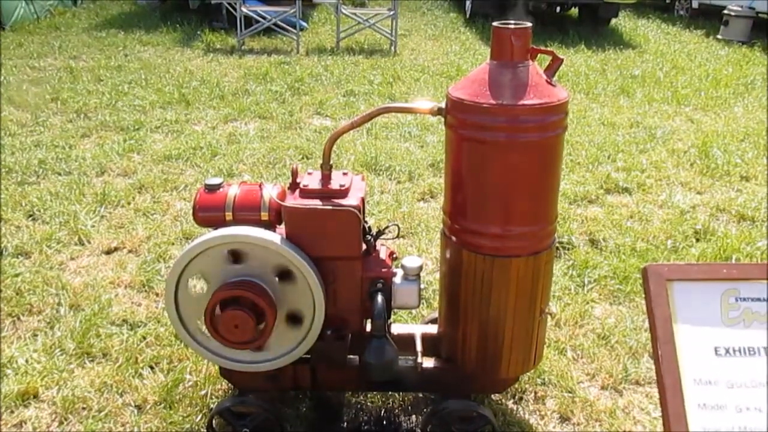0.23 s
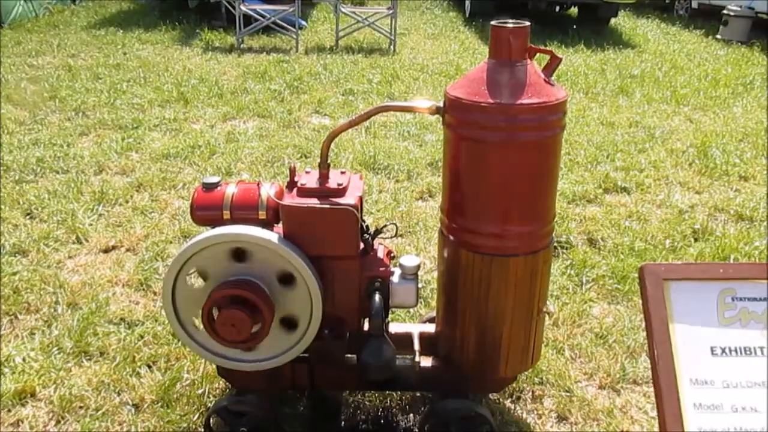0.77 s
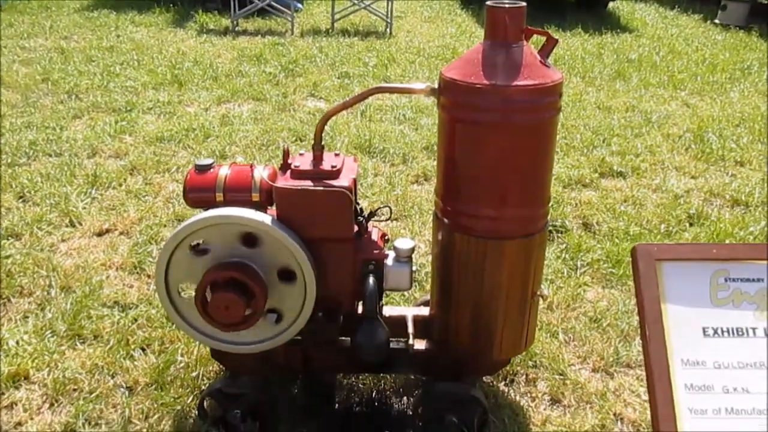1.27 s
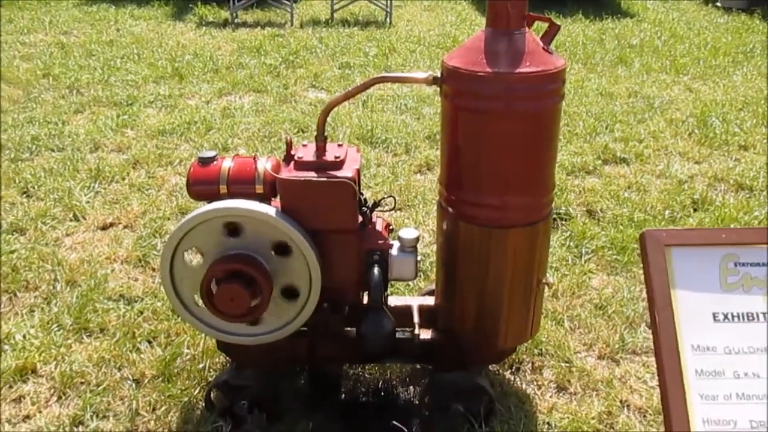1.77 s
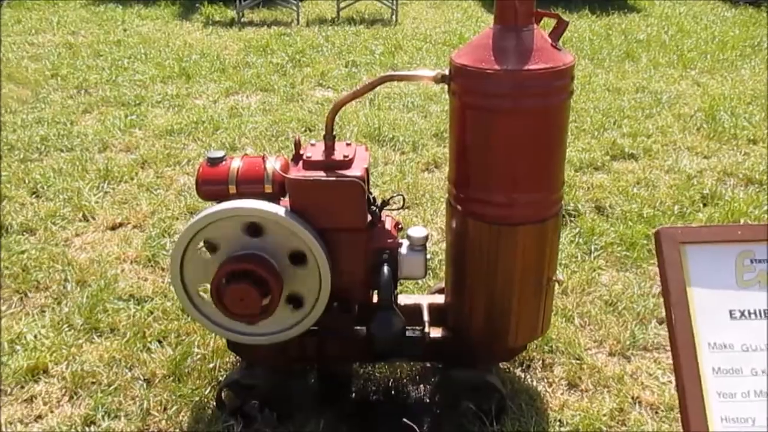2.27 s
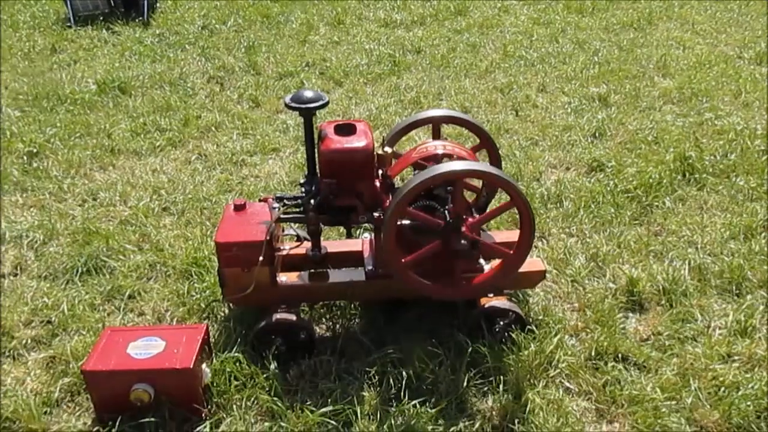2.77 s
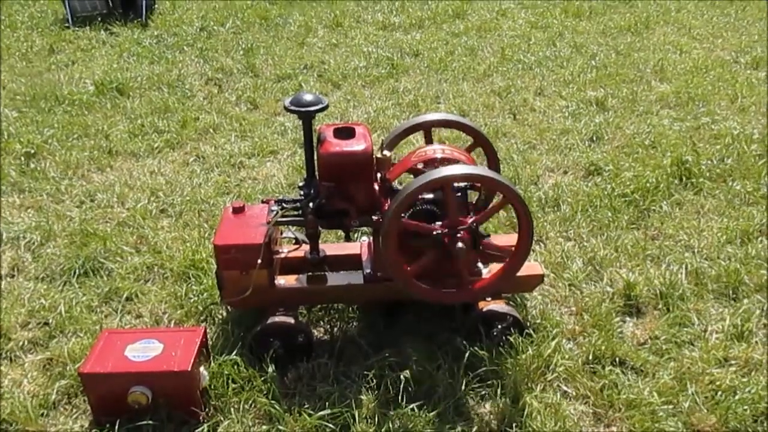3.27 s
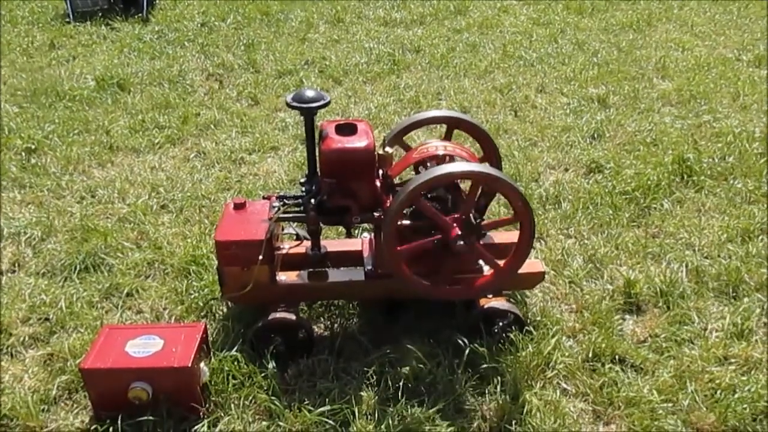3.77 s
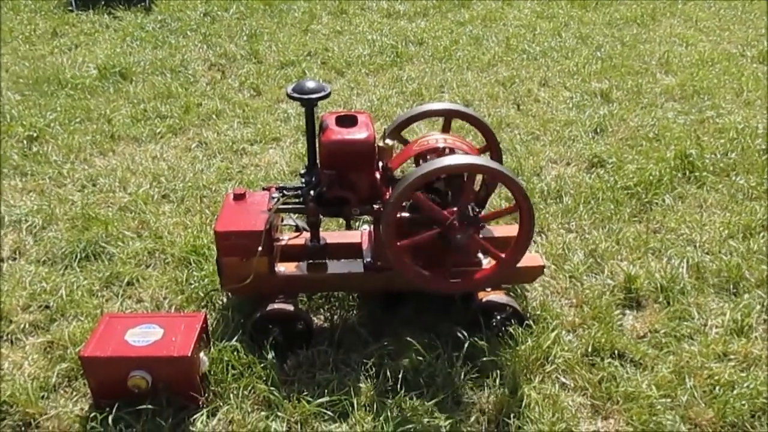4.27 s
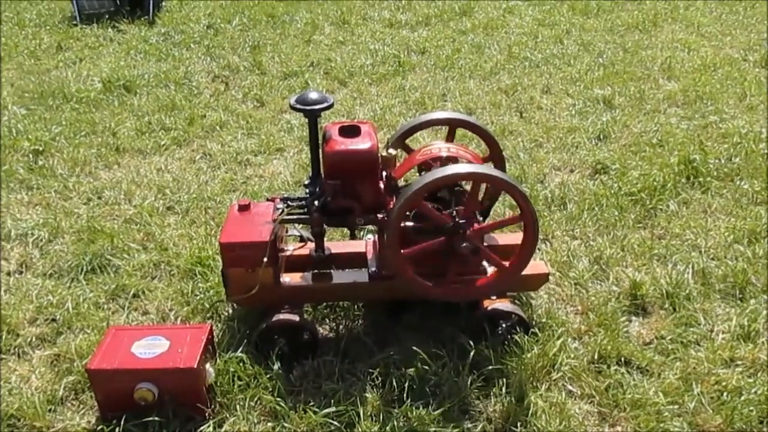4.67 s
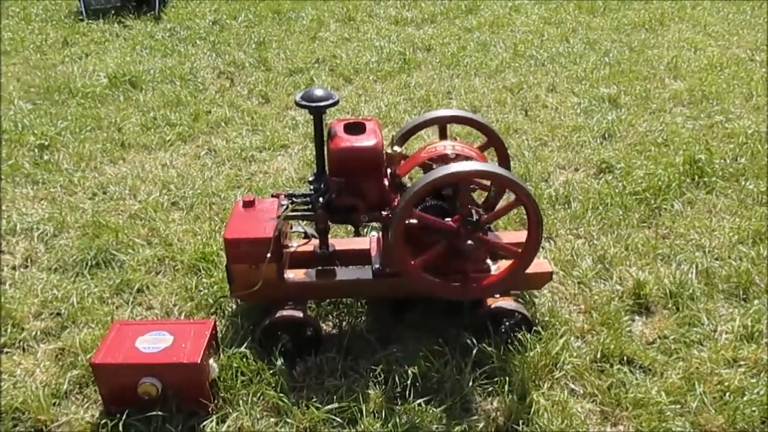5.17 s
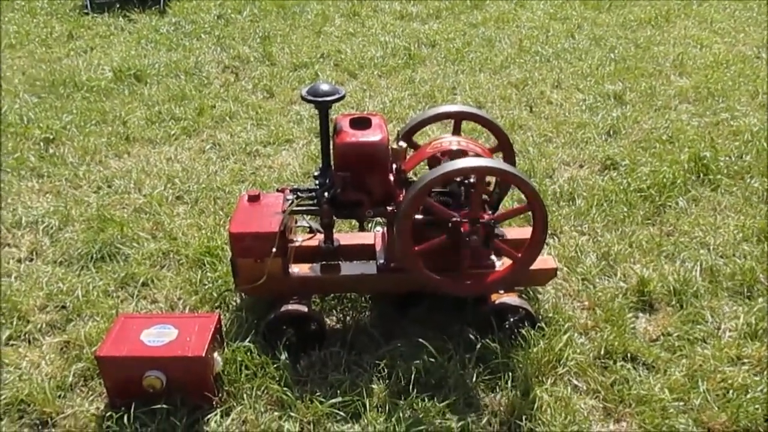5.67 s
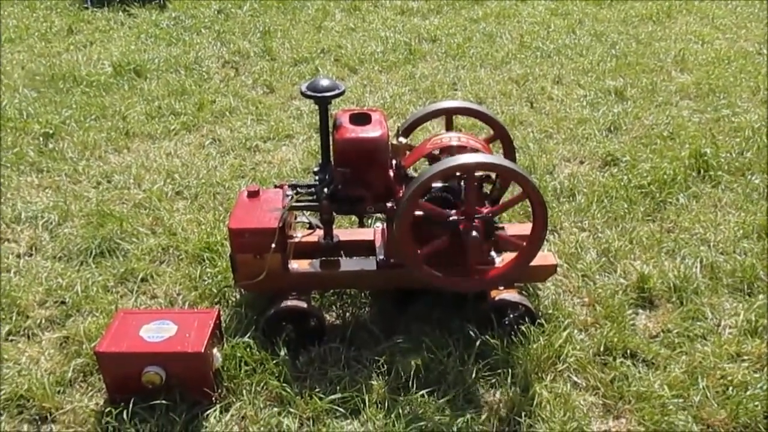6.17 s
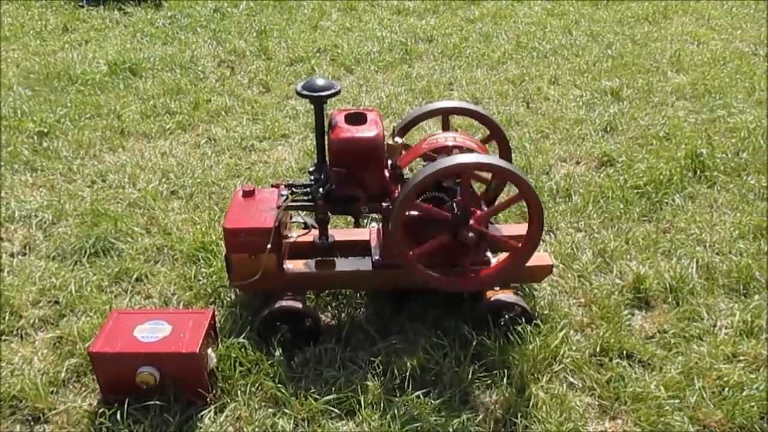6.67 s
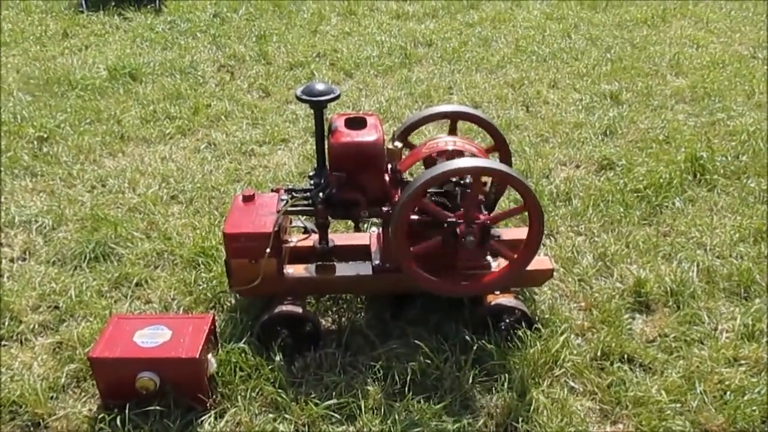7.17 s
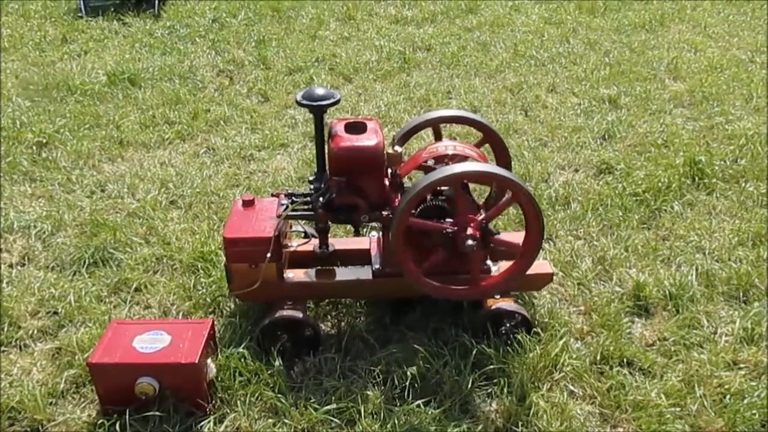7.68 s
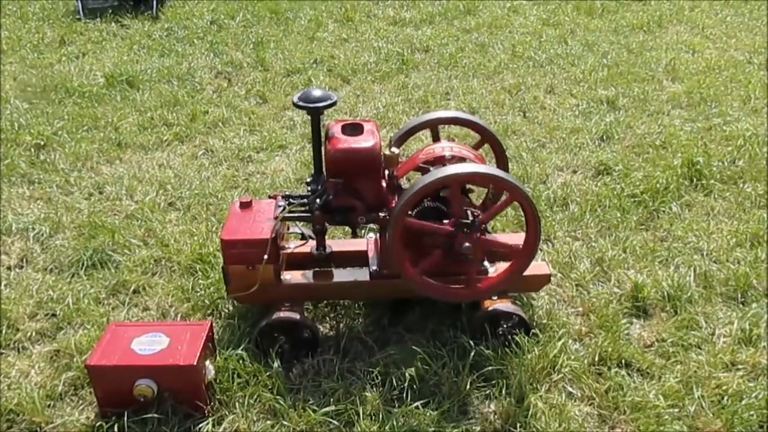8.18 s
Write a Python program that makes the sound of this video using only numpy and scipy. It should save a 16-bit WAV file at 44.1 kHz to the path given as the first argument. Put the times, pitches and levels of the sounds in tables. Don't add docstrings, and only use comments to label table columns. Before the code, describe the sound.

From 0 to 2.1 s a small stationary engine runs close by outdoors: about nine cycles a second of valve ticks, hard mid-pitched metal knocks, dull rattling and a sharp dry exhaust pop, slightly uneven, easing around 0.5 s, over low hum and soft distant thumps. It cuts to silence for about 0.2 s. At 2.35 s a loud low thump and brief hiss open a busier field: a fast fizzing generator buzz to the right, low beating motors, one revving upward around 4 to 5 s. In front, an open-crank engine coasts, with an iron latch clack and brighter tappet tick every 0.4 to 0.45 s. Sharp clicks gather at 2.6-3.0 and 5.8-6.0 s, leading to firings near 2.96 and 6.03 s: a bright swelling hiss, then a short airy snort with a knock. The background dips after each and creeps back. A low thump comes at 7.5 s; clacking continues to 8.4 s.

```python
import sys
import numpy as np
from scipy import signal
from scipy.fft import rfft, irfft
from scipy.io import wavfile
from scipy.ndimage import uniform_filter1d

SR = 44100
rng = np.random.default_rng(int(sys.argv[2]) if len(sys.argv) > 2 else 0)


def gain_from_decibels(decibels):
    exponent = np.asarray(decibels, float) / 20
    return 10 ** exponent


def digitize_waveform(pressure):
    field = np.atleast_2d(pressure).T
    bounded = np.clip(field, -1, 1)
    quanta = np.round(bounded * 32767).astype(np.int16)
    wavfile.write(sys.argv[1], SR, quanta)


N = 371322
T, HZ = np.arange(N) / SR, np.fft.rfftfreq(N, 1 / SR)

CUT_S, RESUME_S, CUT_TAIL_DB = 2.131, 2.351, -20
CYCLES_PER_S = 9.172
FIRINGS_PER_S = 35.7
RUMBLES_PER_S, RUMBLE_SWELL_DB = 3, 5
BACKGROUND_DB, OPENING_DB, SETTLE_S = -20.5, 7, 0.059
DUCK_DB, DUCK_FALL_S, DUCK_HOLD_S = -8.5, 0.055, 0.13
JET_AFTER_S, JET_RISE_S, JET_T60_S = 0.0053, 0.024, 0.18
SNORT_AFTER_S, SNORT_RISE_S, SNORT_HOLD_S, SNORT_T60_S = 0.102, 0.0073, 0.01, 0.021

# pitch in Hz, level in dB per Hz.
FIELD_COLOUR = [(15, -52.5), (25, -21.5), (65, -12.5), (100, -9.5), (121, -5.5), (231, -10.5), (366, -13),
                (408, -14.5), (520, -19), (650, -24.5), (1540, -24.5), (2450, -36), (4000, -37.5),
                (6320, -38.5), (10000, -50.5), (13900, -64), (15100, -54), (16300, -80)]
# pitch in Hz, level in dB per Hz.
OPENING_HISS = [(1500, -7), (2300, 5), (3600, 4), (5000, -16), (9000, -23)]
# start in seconds, pitch in Hz, rise in seconds,
# time to fall 60 dB in seconds, peak in dB.
EARLY_THUMPS = [
    (0.419, 86, 0.14, 0.29, -23),
    (0.849, 96.5, 0.087, 0.3, -23),
    (1.701, 99.6, 0.11, 1., -23),
]
# start in seconds, pitch in Hz, rise in seconds, time
# to fall 60 dB in seconds, peak in dB.
THUMPS = [
    (2.349, 82, 0.011, 0.31, -7.5),
    (4.98, 82, .04, .3, -32),
    (5.6, 91, .1, 0.52, -16.5),
    (6.85, 83, 0.049, 0.37, -19),
    (2.8, 190, .12, .6, -25.5),
    (3.3, 180, .02, .09, -14.5),
    (6.033, 236, .002, .02, -12.5),
    (8.18, 195, .1, .5, -23.5),
    (7.534, 85, 0.028, 0.2, -10),
]
# time in seconds, pitch in Hz, level in dB over the background.
MOTOR = [(2.36, 116, -5.5), (2.76, 118.5, -3.5), (3.3, 103, -12.5), (3.7, 106, -2), (4.1, 104, -9),
         (4.5, 106, -20), (4.91, 110, -4.5), (5.3, 116, -2), (5.65, 119.5, -1.5), (6.14, 111, -2),
         (6.7, 116, 1), (7.0, 116.5, 0), (7.6, 121, 0.5), (8.0, 123, -1), (8.42, 129, 2.5)]
# multiple of the pitch, level in dB.
MOTOR_ORDERS = [(1, 1.5), (1.5, -11), (3.55, -18)]
# time in seconds, pitch in Hz, level in dB over the background.
REVVER = [(2.36, 84.3, -3.5), (2.8, 91.6, -6), (3.5, 91.3, -3), (3.87, 89.5, -3), (4.2, 101.1, 1.5),
          (4.33, 106.3, 4), (4.41, 110, -13), (4.48, 113.9, -0.5), (4.72, 122.2, -2), (4.9, 118.9, -1),
          (5.2, 122, -1.5), (5.4, 128, -5), (6.0, 140, -12)]
# time in seconds, pitch in Hz, level in dB over the background.
WHINE = [(2.36, 320, -11.5), (2.9, 322, -17), (3.5, 308, -15.5), (4.6, 296, -11), (5.6, 331, -15),
         (6.1, 309, -12), (6.8, 323, -11), (7.3, 325, -21.5), (8.42, 322, -14)]
# multiple of the pitch, level in dB.
WHINE_ORDERS = [(1, 1), (.6, 3.5)]
# time in seconds, turns ahead of steady running.
GENERATOR_LEAD = [(2.36, -.2), (4.0, -.45), (5.98, -.91), (6.4, -.92), (7.59, -.65), (8.4, -.65)]
# multiple of the firing rate, level in dB over the background.
GENERATOR_ORDERS = [(2, -12.5), (3, -23), (4, -24), (5, -14), (6, -23), (7, -14.5), (8, -16), (9, -18),
                    (11, -19.5)]
# pitch in Hz, level in dB.
FIZZ_COLOUR = [(2500, -20), (5000, -1), (6500, -0.5), (8000, -3), (9300, -3), (11000, -10.5), (13500, -12),
               (14700, -8), (15500, -3), (16400, -26)]
# time in seconds, level in dB.
FIZZ_LEVEL = [(2.35, 0), (2.45, 0), (3, -1.5), (3.5, -0.5), (4, 0), (4.6, -2), (5.2, -0.5), (5.6, -4),
              (6, -1.5), (6.6, -2), (7.4, -3.5), (8.43, -4.5)]
# time in seconds, share from 0 to 1.
FILL = [(2.35, 0.1), (3.4, 0.04), (4.2, .05), (4.8, .2), (5.4, .3), (5.7, .55), (6.02, .6), (6.2, .1),
        (7.2, 0), (8.43, 0.14)]

# pitch in Hz, level in dB per Hz.
SMALL_BED = [(15, -36), (25, -20.5), (70, -7.5), (146, -1.5), (225, -10.5), (303, -7), (481, -20.5),
             (536, -17), (762, -10.5), (1060, -19.5), (1540, -21), (2260, -24.5), (3500, -29.5),
             (4200, -34.5), (6670, -35.5), (14300, -60), (16300, -54.5)]
# time in seconds, pitch in Hz, level in dB.
HUM = [(0.0, 158.8, -24.5), (0.17, 154, -27), (0.53, 153.9, -24), (0.76, 154.2, -29.5),
       (1.02, 158.4, -27.5), (1.17, 158.2, -25.5), (1.49, 156.6, -25.5), (1.94, 156.8, -24.5),
       (2.13, 155.0, -30.5)]
# pitch in Hz, level in dB per Hz.
RUSTLE = [(10000, -31), (11500, -1), (15000, 1), (16300, -6)]
# time in seconds, level in dB.
LOAD = [(0, .5), (.38, 0), (.47, -4), (.6, -2.5), (.7, 1), (.85, 0.5), (1.1, 0), (1.45, 1.5), (1.65, 2.5),
        (1.85, 1), (2.13, 0)]
# place in the cycle in seconds, pitch in Hz,
# time to fall 60 dB in seconds, peak in dB.
KNOCKS = [(.0235, 750, 0.076, -23), (.0235, 1480, .02, -33), (.024, 2100, .012, -24.5),
          (.035, 3800, .012, -26), (.036, 3100, .012, -33.5), (0.0456, 1540, 0.042, -18.5),
          (0.0453, 1860, 0.019, -22), (.046, 1180, 0.031, -20), (.047, 800, 0.037, -26.5),
          (.057, 775, .03, -29), (.061, 547, 0.076, -19.5), (.072, 486, 0.036, -26),
          (.064, 918, .025, -16.5), (.066, 633, .03, -20.5), (.068, 1150, 0.016, -26),
          (.070, 405, 0.057, -22.5), (.073, 816, 0.019, -20), (.076, 1490, .03, -27.5),
          (.082, 740, .03, -26.5), (0.081, 3300, .012, -34), (.087, 1485, 0.035, -28.5),
          (.089, 873, 0.0317, -24.5), (.092, 195, 0.0088, -18), (.094, 1540, .025, -28),
          (0.0972, 2860, 0.025, -27.5), (.0985, 4270, 0.014, -32), (.0997, 726, 0.012, -10.5),
          (0.1019, 305.3, .09, -17), (0.1016, 1720, 0.024, -20), (0.1019, 256, .072, -20)]
# place in the cycle in seconds, rise in seconds,
# time to fall 60 dB in seconds, level in dB, brightness from 0 to 1.
SNIFFS = [
    (.023, 0.0011, 0.026, -25, 1),
    (.035, .001, .016, -31.5, 0.8),
    (.045, .002, 0.036, -27.5, 0.2),
    (.057, .001, 0.024, -28.5, 0.46),
    (0.067, .002, 0.041, -24.5, 0.42),
    (0.085, 0.0094, 0.058, -24.5, 0.5),
    (.099, 0.001, 0.027, -26, 0.51),
]
# pitch in Hz, level in dB per Hz.
CLATTER = [(350, -37.5), (600, -10), (759, 0), (1390, 0), (1540, -3), (2230, -13), (7030, -19),
           (10300, -34.5), (12700, -33), (16300, -41)]

# start in seconds, peak in dB, pitch
# in Hz.
CLINKS = [
    (3.9145, -16, 2300),
    (3.916, -11, 1050),
    (3.576, -19, 1900),
    (4.9075, -30, 3100),
    (4.9786, -21.5, 3370),
    (5.0504, -24.5, 3330),
    (5.465, -25, 3090),
]
# start in seconds, peak
# in dB, ring in Hz, upper ring in Hz, upper ring level in dB.
TRIPS = [(2.4142, -21, 4740, 9000, -8), (2.5808, -28, 4630, 8000, -6), (2.6044, -22, 3420, 7000, -6),
         (2.6901, -26, 4900, 9000, -8), (3.7626, -24, 7380, 9000, -8), (4.724, -31, 6200, 9000, -8),
         (7.6109, -23, 3260, 9000, -15), (2.7098, -8.5, 5500, 9360, -27), (2.7791, -17.5, 5180, 11440, -5),
         (2.815, -9, 4220, 10000, -4), (2.93, -18, 4780, 12050, -13), (2.9612, -5, 5400, 9240, -6.5),
         (4.045, -33, 5730, 9100, -18), (5.121, -28, 6200, 7260, -6), (5.0496, -21, 6100, 9190, -22),
         (5.7894, -9.5, 5500, 11930, -25), (5.813, -27, 6400, 12000, -8), (5.8576, -22, 5200, 11970, -1),
         (5.8917, -12.5, 4200, 9800, 1), (5.9174, -40, 4680, 10470, -13), (6.0337, -8.5, 5460, 11660, -7)]
# start in seconds, peak in dB.
LATCHES = [(2.622, -8), (3.5077, -12.5), (3.914, -12), (4.3343, -10), (4.7744, -10.5), (5.231, -13),
           (5.703, -11.5), (6.574, -13), (6.9752, -11), (7.391, -11), (7.8237, -11), (8.2714, -10.5)]
# pitch in Hz, time to fall 60 dB in seconds, level in dB.
LATCH_RING = [(1150, 0.032, 1.5), (1740, 0.034, -6), (2510, .025, -16), (3960, .018, -26), (4900, .02, -14),
              (5860, 0.025, -12), (8100, 0.017, -8), (12800, .018, -11)]
# start in seconds, peak in dB.
TAPPETS = [(3.1755, -13.5), (3.57, -9), (3.9795, -9), (4.4028, -9.5), (4.8423, -9), (5.3015, -11),
           (6.2466, -14.5), (6.636, -11.5), (7.041, -10.5), (7.4573, -9), (7.892, -9.5), (8.343, -10)]
# pitch in Hz, time to fall 60 dB in seconds, level in dB.
TAPPET_RING = [(5120, .009, -6), (6340, .009, -7), (9070, 0.0082, 6), (12300, .008, -13)]
# delay in seconds, rise in seconds, time to fall 60 dB in seconds, level in dB.
BOUNCES = [
    (0, 0.0024, 0.011, -9),
    (.0042, 0.002, 0.013, -20.5),
    (.008, .002, .022, -14),
]
# pitch in Hz, level in dB per Hz.
STEEL = [(880, -1), (1500, 1), (2800, -4.5), (4370, -4), (6140, -1.5), (8970, -8), (13800, -18.5),
         (15200, -15), (16300, -58)]
# pitch in Hz, level in dB per Hz.
IRON = [(410, -34), (700, -2), (1190, -2.5), (1980, -7), (3020, -12), (3310, -14.5), (4860, -7),
        (9640, -27.5), (13100, -32), (16300, -34)]
# igniter time in seconds, jet in dB, snort in dB, gain recovery in seconds.
FIRINGS = [
    (2.9617, -15.5, -26, 0.34),
    (6.0332, -16.5, -27, 0.55),
]
# pitch in Hz, level in dB per Hz.
JET = [(1180, -50), (2000, -12), (2770, -21), (3160, -13), (3450, -8), (3730, -10), (4530, -0.5),
       (5540, -1.5), (6000, -3), (9140, -6), (12200, 0), (15500, -4), (16300, -33)]
# pitch in Hz, width in Hz, level in dB.
JET_PIPES = [(2670, 120, -20), (3730, 200, -20), (4640, 200, -13), (5500, 200, -17)]
# pitch in Hz, level in dB per Hz.
SNORT = [(290, -43), (500, -11.5), (786, 5), (2420, -16), (2680, -17), (4030, -10), (4390, -19.5),
         (6810, -11), (7430, -7), (12200, -14), (16300, -24)]
# delay into the snort in seconds, pitch in Hz,
# time to fall 60 dB in seconds, level in dB over the snort.
SNORT_KNOCK = [
    (.008, 746, 0.073, 0),
    (.018, 1260, 0.04, 2.5),
]

# pitch in Hz, likeness from 0 to 1.
AHEAD_SAME = [(60, 0.81), (130, 1), (290, 0.66), (640, 0.99), (1410, 0.91), (3100, 0.56), (6820, 0.43),
              (15000, 0.45)]
CRANK_SAME = [(500, 0.8), (3000, 0.96), (15000, 0.5)]
RIGHT_SAME = [(60, 0.82), (300, 0.89), (1000, 0.5), (3000, 0.79), (15000, 0.28)]
# pitch in Hz, left minus right in dB.
AHEAD_BALANCE = [(60, 5.9), (240, 5.7), (950, 3.2), (3770, 0.5), (15000, 1.0)]
CRANK_BALANCE = [(500, 2.3), (3000, .5), (9000, 2.5), (15000, 3.7)]
RIGHT_BALANCE = [(30, 4), (60, 9.5), (180, 5.5), (550, 2.5), (1650, -2.5), (4970, -4), (15000, 2.5)]
RIGHT_LAG_S = 6 / SR
# pitch in Hz, level in dB.
MICROPHONE = [(1100, -1), (1550, -1), (2100, -2), (3100, 1), (4100, -2), (5500, -1.3), (7600, 0.5),
              (7900, -3), (8200, 1.5)]


def evened(x):
    return x / np.sqrt(np.mean(x ** 2) + 1e-20)


def read(points):
    f, value = np.transpose(points)
    return np.interp(np.log(HZ + 1), np.log(f + 1), value)


def noise(spectrum, tilt_db=0):
    z = rng.standard_normal((2, len(HZ)))
    inside = (HZ > spectrum[0][0] / 2) * (HZ < spectrum[-1][0] * 2)
    colour = gain_from_decibels(read(spectrum) + tilt_db * np.log2((HZ + 1) / 4000))
    return evened(irfft((z[0] + 1j * z[1]) * inside * colour, N))


def flicker(hz, db):
    slow = signal.lfilter([1], [1, -np.exp(-2 * np.pi * hz / SR)], rng.standard_normal(N))
    return gain_from_decibels(db * evened(uniform_filter1d(slow, int(SR / hz / 2))))


def level(rows, edge_s=0.0023):
    s = np.transpose(rows)[0]
    inside = np.clip(np.minimum(T - s[0], s[-1] - T) / edge_s, 0, 1)
    return inside * gain_from_decibels(np.interp(T, s, np.transpose(rows)[-1]))


def tone(rows, multiple=1):
    s, hz, _ = np.transpose(rows)
    turns = multiple * np.cumsum(np.interp(T, s, hz)) / SR
    return np.sqrt(2) * level(rows) * np.sin(2 * np.pi * turns)


def whistle(hz, width_hz):
    z = rng.standard_normal((2, N))
    slow = signal.lfilter([1], [1, -np.exp(-np.pi * width_hz / SR)], z[0] + 1j * z[1])
    return evened((slow * np.exp(2j * np.pi * np.cumsum(hz * np.ones(N)) / SR)).real)


def blows(s, db):
    places = np.clip(np.round(np.asarray(s) * SR), 0, N - 1).astype(int)
    return np.bincount(places, gain_from_decibels(np.asarray(db)), N)


def later(train, s):
    return np.roll(train, int(s * SR))


def ring(train, hz, t60, rise=1e-5):
    t = np.arange(int(t60 * SR)) / SR
    envelope = (1 - np.exp(-t / rise)) * gain_from_decibels(-60 * t / t60)
    return signal.oaconvolve(train, envelope * np.sin(2 * np.pi * hz * t))[:N]


def burst(train, rise, t60):
    t = np.arange(int((rise + t60) * SR)) / SR
    envelope = np.minimum(t / rise, 1) * gain_from_decibels(-60 * np.maximum(t - rise, 0) / t60)
    return signal.oaconvolve(train, envelope)[:N]


def thump(s, hz, rise, t60, db):
    return -burst(blows([s], [db]), rise, t60) * np.sin(2 * np.pi * hz * (T - s))


def rumble(db, spectrum):
    return gain_from_decibels(db) * flicker(RUMBLES_PER_S, RUMBLE_SWELL_DB) * noise(spectrum)


def far_motors():
    out = tone(REVVER)
    for rows, orders in ((MOTOR, MOTOR_ORDERS), (WHINE, WHINE_ORDERS)):
        out += sum(gain_from_decibels(db) * tone(rows, multiple) for multiple, db in orders)
    return out


def generator():
    turns = FIRINGS_PER_S * T + np.interp(T, *np.transpose(GENERATOR_LEAD))
    buzz = sum(gain_from_decibels(db) * flicker(5.9, 3.6) * np.cos(2 * np.pi * k * turns) for k, db in GENERATOR_ORDERS)
    swing = np.cos(2 * np.pi * turns)
    puffs = np.exp(1.8 * (swing - 1)) + 0.1 * np.exp(8.7 * (-swing - 1))
    fill = np.clip(np.interp(T, *np.transpose(FILL)), 0, 1)
    puffs = (1 - fill) * puffs + fill * puffs.mean() * 1.4
    fizz = puffs * level(FIZZ_LEVEL) * flicker(25, 2.1) * noise(FIZZ_COLOUR)
    return buzz + gain_from_decibels(-12.5) * fizz


def gain_ride():
    db = BACKGROUND_DB + OPENING_DB * np.exp(-np.maximum(T - RESUME_S, 0) / SETTLE_S)
    for s, _, _, recover_s in FIRINGS:
        t = T - s
        recovery = np.exp(-np.maximum(t - DUCK_FALL_S - DUCK_HOLD_S, 0) / recover_s)
        db = db + DUCK_DB * np.clip(t / DUCK_FALL_S, 0, 1) * recovery
    return gain_from_decibels(db)


def field():
    wash = gain_from_decibels(-0.55) * noise(FIELD_COLOUR) * flicker(55.5, 1.93)
    far = rumble(-16, [(58, -28), (70, -2.5), (92, 1.0), (110, -14.5), (200, -44.0)]) + far_motors()
    hiss_span = [(RESUME_S - 0.01, -35), (RESUME_S + 0.087, -35)]  # (s, dB)
    hiss = level(hiss_span, edge_s=0.0094) * noise(OPENING_HISS)
    return gain_ride() * (wash + generator() + far) + hiss + sum(thump(*row) for row in THUMPS)


def small_engine_surroundings():
    swell_db = 2.3 * np.cos(2 * np.pi * (CYCLES_PER_S * T - 0.75))
    out = gain_from_decibels(-24.5 + swell_db) * noise(SMALL_BED) * flicker(200, 2.1)
    out += tone(HUM) * flicker(2.4, 0.8)
    out += rumble(-43.5, [(60, -32), (72, -0.5), (95, 6), (120, -7.5), (200, -58.0)])
    out += sum(thump(*row) for row in EARLY_THUMPS)
    return out + level([(0.78, -52), (0.845, -52)], edge_s=0.01) * noise(RUSTLE)


def small_engine(knock_spread_db=1.0, sniff_spread_db=1.5, slack_s=0.0001):
    out = small_engine_surroundings()
    starts = np.arange(20) / CYCLES_PER_S
    load_db = np.interp(starts + 0.05, *np.transpose(LOAD))
    for s, hz, t60, db in KNOCKS:
        luck = rng.standard_normal((len(starts), 2))
        uneven_db = load_db + knock_spread_db * luck[:, 1]
        train = blows(starts + s + slack_s * luck[:, 0], db + 0.66 + uneven_db)
        out += ring(train, hz, t60, rise=0.0011)
    u = np.arange(400) / SR / 0.00039 - 4
    push = (1 - u ** 2) * np.exp(-u ** 2 / 2)
    out += signal.oaconvolve(blows(starts + 0.1009, -11 + uneven_db), push)[:N]
    dull, bright = noise(CLATTER), noise(CLATTER, tilt_db=4.5)
    for s, rise, t60, db, bright_share in SNIFFS:
        uneven_db = 0.6 * load_db + sniff_spread_db * rng.standard_normal(len(starts))
        hiss = (1 - bright_share) * dull + bright_share * bright
        out += burst(blows(starts + s, db + uneven_db), rise, t60) * hiss
    return out


def latch():
    s, db = np.transpose(LATCHES)
    out = gain_from_decibels(-6.5) * burst(later(blows(s, db), -0.0024), 0.0028, 0.06) * noise(IRON)
    for hz, t60, part_db in LATCH_RING:
        luck_db = 3 * rng.standard_normal(len(s))
        out += gain_from_decibels(part_db - 4.5) * ring(blows(s - 0.001, db + luck_db), hz, t60, rise=0.002)
    return out


def tappet():
    train = later(blows(*np.transpose(TAPPETS)), -0.0014)
    bounces = sum(gain_from_decibels(db) * burst(later(train, late), rise, t60) for late, rise, t60, db in BOUNCES)
    scrape = gain_from_decibels(-21) * burst(later(train, -0.0083), 0.019, 0.08) * noise(IRON)
    rings = sum(gain_from_decibels(db - 10.5) * ring(train, hz, t60, rise=0.0012) for hz, t60, db in TAPPET_RING)
    return bounces * noise(STEEL) + scrape + rings


def trips():
    crisp = noise(STEEL, tilt_db=1.0)
    out = np.zeros(N)
    for s, db, hz, upper_hz, upper_db in TRIPS:
        blow = blows([s], [db])
        rebound = 0.6 * ring(later(blow, 0.0021), 1.08 * hz, 0.014)
        out += gain_from_decibels(-5) * (ring(blow, hz, 0.016) + rebound)
        out += gain_from_decibels(upper_db) * ring(blow, upper_hz, 0.007, rise=0.0005)
        out += gain_from_decibels(-9.5) * burst(blow, 0.0021, 0.023) * crisp
    return out


def exhaust_jet():
    s, jet_db, _, _ = np.transpose(FIRINGS)
    blast = noise(JET) + sum(gain_from_decibels(db) * whistle(hz, width_hz) for hz, width_hz, db in JET_PIPES)
    return burst(blows(s + JET_AFTER_S, jet_db), JET_RISE_S, JET_T60_S) * blast * flicker(400, 1.2)


def intake_snort():
    s, _, snort_db, _ = np.transpose(FIRINGS)
    start = s + SNORT_AFTER_S
    t = T[:, None] - start
    full_s = SNORT_RISE_S + SNORT_HOLD_S
    fall_db = -60 * np.clip(t - full_s, 0, 1) / SNORT_T60_S
    gulp = (np.clip(t / SNORT_RISE_S, 0, 1) * gain_from_decibels(snort_db + fall_db)).sum(axis=1)
    closing = (np.clip(t / full_s, 0, 1) * (t < 1)).sum(axis=1)
    suck = noise(SNORT) + gain_from_decibels(-4) * whistle(5599.5 + 1400 * closing, width_hz=350)
    knock = sum(ring(blows(start + late, snort_db + db), hz, t60) for late, hz, t60, db in SNORT_KNOCK)
    return knock + gulp * suck * flicker(121, 2.9)


def crank_engine():
    clinks = sum(ring(blows([s], [db]), hz, 0.016) for s, db, hz in CLINKS)
    return clinks + trips() + latch() + tappet() + exhaust_jet() + intake_snort()


def ports(source, same, balance, lag_s=0):
    same, lean = np.clip(read(same), 0, 1), gain_from_decibels(read(balance) / 2)
    left = rfft(source())
    shared = same * left * np.exp(2j * np.pi * HZ * lag_s)
    right = shared + np.sqrt(1 - same ** 2) * rfft(source())
    middle = np.sqrt(lean ** 2 + lean ** -2 + 2 * same * np.cos(2 * np.pi * HZ * lag_s)) / 2
    return irfft(np.array([left * lean, right / lean]) / middle, N)


def scene():
    first = ports(small_engine, AHEAD_SAME, AHEAD_BALANCE)
    second = ports(field, RIGHT_SAME, RIGHT_BALANCE, RIGHT_LAG_S)
    second += ports(crank_engine, CRANK_SAME, CRANK_BALANCE)
    dull = signal.sosfilt(signal.butter(4, 2500, fs=SR, output="sos"), first)
    scrap = gain_from_decibels(CUT_TAIL_DB) * np.clip(1 - (T - CUT_S) / 0.0091, 0, 1) * dull
    return np.where(T < CUT_S, first, scrap) + second * np.clip((T - RESUME_S) / 0.00054, 0, 1)


def low_pass(x):
    return signal.sosfilt(signal.butter(12, 16480, fs=SR, output="sos"), x)


def record(dry):
    coloured = irfft(rfft(dry) * gain_from_decibels(read(MICROPHONE)), N)
    edge = signal.firwin(1023, 16150, window=("kaiser", 8), fs=SR)
    limited = signal.oaconvolve(np.clip(coloured, -1, 1), edge[None], "same")
    return low_pass(limited)


dry = scene()
out = record(dry)
digitize_waveform(out)
```